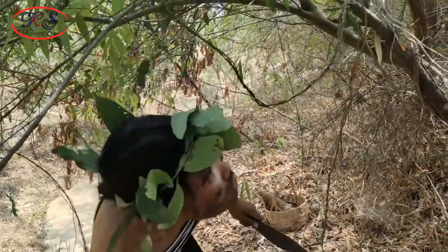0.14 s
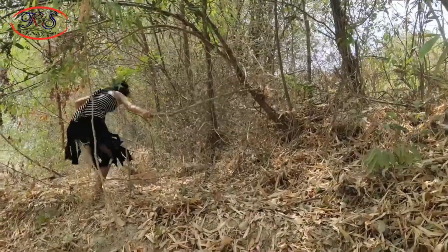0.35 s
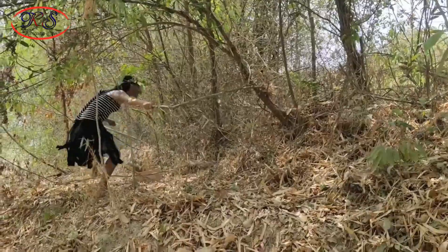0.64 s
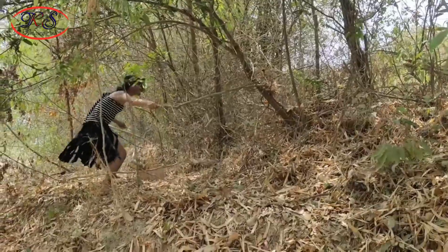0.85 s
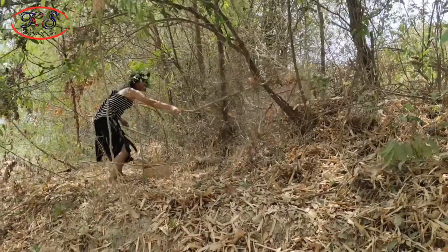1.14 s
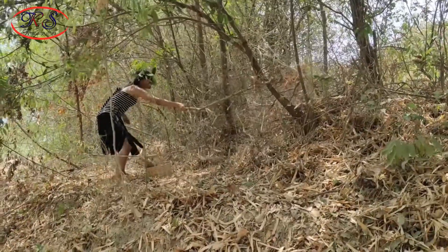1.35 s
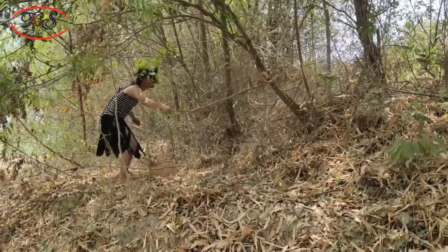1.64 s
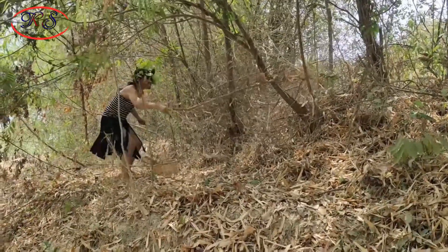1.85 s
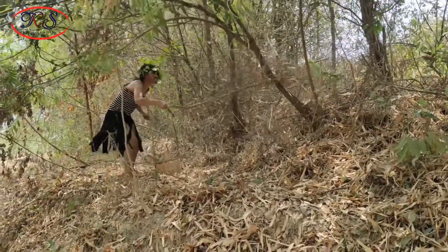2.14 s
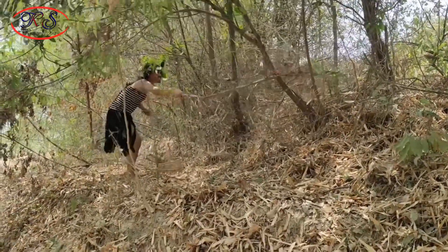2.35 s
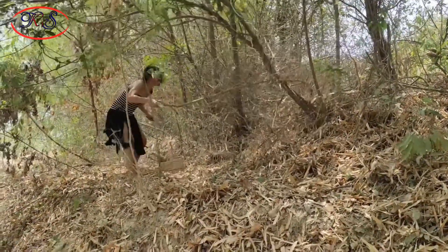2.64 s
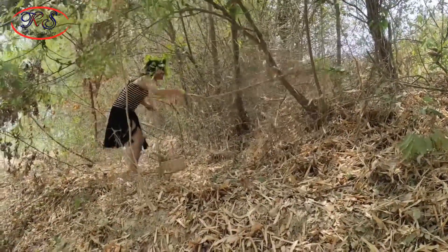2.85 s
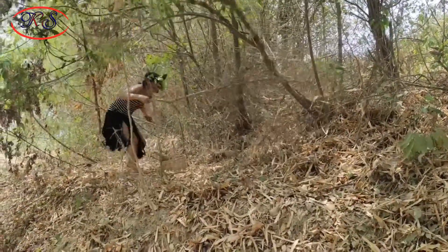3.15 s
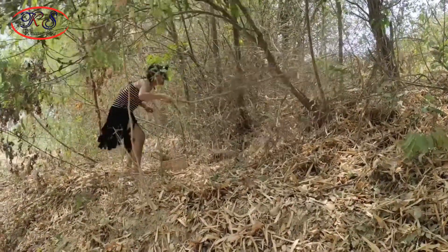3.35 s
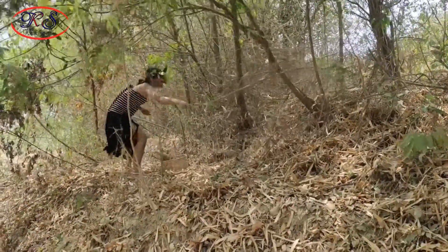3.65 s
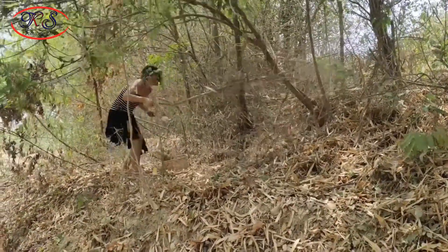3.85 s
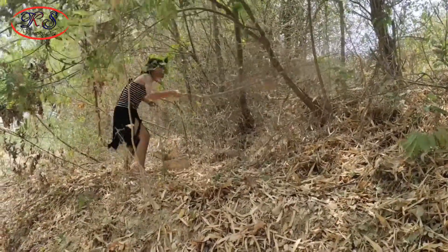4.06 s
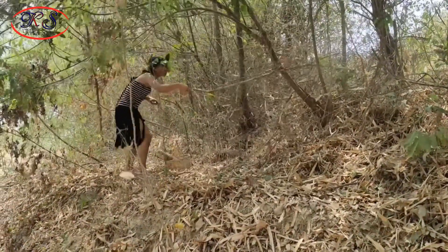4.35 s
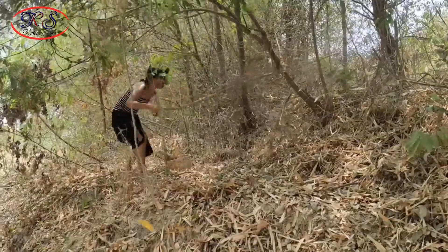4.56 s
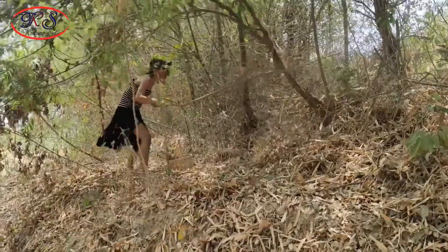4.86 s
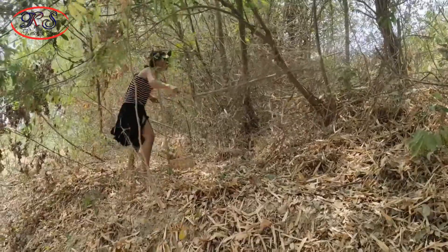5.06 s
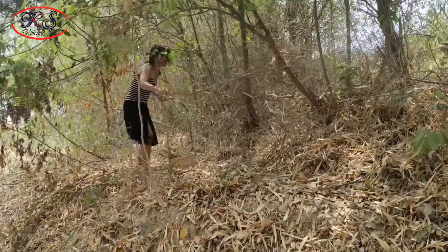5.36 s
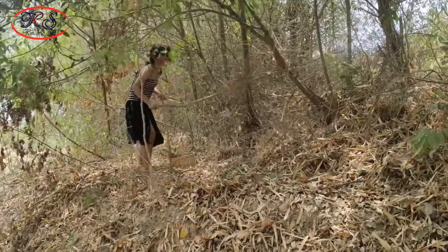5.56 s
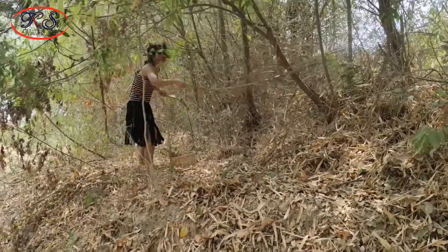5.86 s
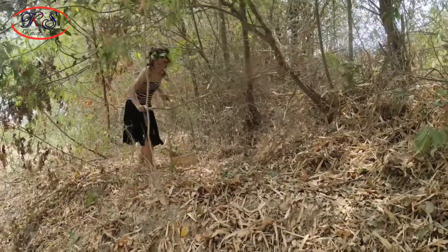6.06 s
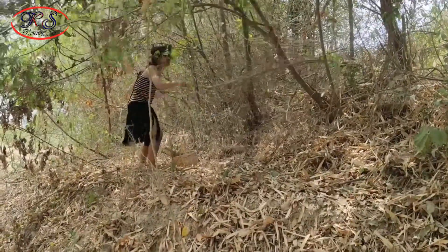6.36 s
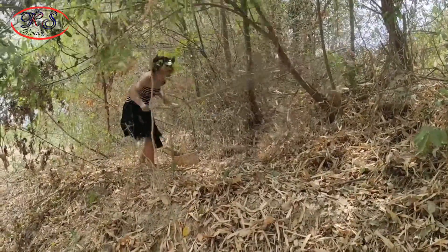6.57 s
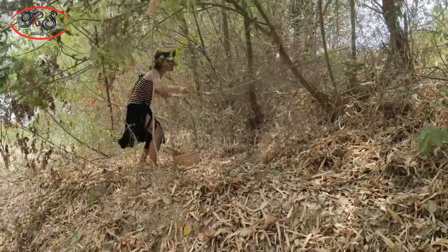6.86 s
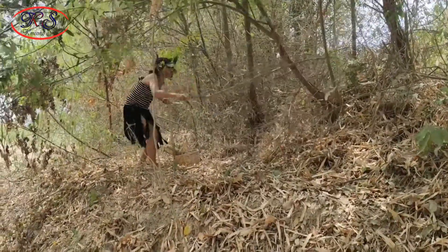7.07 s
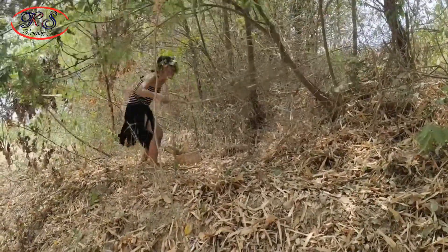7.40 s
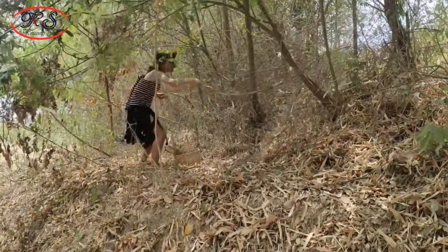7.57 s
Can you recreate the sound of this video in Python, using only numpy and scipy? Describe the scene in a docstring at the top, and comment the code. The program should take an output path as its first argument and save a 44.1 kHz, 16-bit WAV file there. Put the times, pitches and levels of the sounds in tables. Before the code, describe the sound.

In a dry forest, a few metres from the microphone, a long stick is pushed through brush and leaf litter. Soft shuffling opens it, then a loud double twig snap at 0.25 s, followed by small ticks and dull scuffs. Another hard snap comes at 1.04 s, with a faint reedy scrape of a hollow stem nearby, and the third at 1.95 s, each with a brief grainy tail. From 2.4 s the leaf swishes grow stronger: bright hissing swells with rattling thin stems near 2.5, 3.1, 3.7, 4.5, 6.1 and 6.6 s, and weaker ones between. Smaller snaps crackle at 3.1, 3.6, 4.55, 5.3, 6.0-6.1, 6.55 and 6.9 s, among scattered leaf ticks. Rustling continues to the end at 7.7 s. Low, soft wind puffs bump the microphone, most around 3.3 and 6 s. The top end is slightly dulled.

```python
"""A stick through dry brush

In a forest, some metres from the microphone, someone sweeps a long stick through dry brush and leaf litter.
Each push swells a hiss of leaves and a rattle of stems, both made from patchy noise and tiny rings.
Twigs snap as struck modes with a scattered tail, single leaves tick, and a scraped hollow stem sings.
Under it lie dull, patchy scuffs of filtered noise and low puffs of light wind on the microphone."""
import sys
import numpy as np
from scipy import signal
from scipy.fft import rfft, irfft, next_fast_len
from scipy.io import wavfile

SR = 44100
rng = np.random.default_rng(int(sys.argv[2]) if len(sys.argv) > 2 else 0)


def to_wav(s):
    """Save 16-bit WAV."""
    ch = np.atleast_2d(s).T  # columns
    pcm = np.round(np.clip(ch, -1, 1) * 32767)  # PCM
    wavfile.write(sys.argv[1], SR, pcm.astype(np.int16))


N = 340874
TIME = np.arange(N) / SR  # s

# Pushes of the stick through the brush, from full sweeps to light nudges.
# Each row: time of the height in seconds, leaves in dB, stems in dB (both before trims), length in seconds.
SWEEPS = [(0.229, -46.5, -44, 0.039), (0.746, -57, -70, 0.026), (0.873, -49, -54, 0.055),
          (1.113, -45, -54, 0.15), (1.674, -47, -53, 0.049), (1.914, -46, -48, 0.069),
          (2.124, -47, -49, 0.052), (2.268, -46, -50.5, 0.093), (2.466, -38.5, -45.5, 0.068),
          (2.66, -50.5, -52, 0.23), (2.84, -43.5, -50, 0.069), (3.077, -38.5, -46, 0.08),
          (3.115, -49, -44, 0.039), (3.32, -47, -57, 0.075), (3.455, -45.5, -50.5, 0.11),
          (3.676, -41, -52.5, 0.051), (3.736, -36.5, -46, 0.055), (3.87, -49.5, -72, 0.095),
          (4.032, -46, -55.5, 0.13), (4.19, -75, -52.5, 0.086), (4.549, -38.5, -43.5, 0.081),
          (4.796, -50.5, -54, 0.1), (4.883, -46.5, -56, 0.045), (5.337, -48.5, -45.5, 0.046),
          (5.436, -46, -52, 0.088), (5.586, -55, -47.5, 0.086), (5.87, -53, -50.5, 0.092),
          (5.976, -45, -70, 0.032), (6.067, -37.5, -55, 0.064), (6.166, -52, -52, 0.053),
          (6.38, -45.5, -48.5, 0.039), (6.569, -38.5, -52, 0.058), (6.733, -47.5, -57.5, 0.25),
          (6.918, -40, -64, 0.043), (7.01, -71, -50, 0.052), (7.142, -40.5, -48, 0.11),
          (7.406, -46.5, -64, 0.16), (7.563, -64, -51, 0.22), (7.725, -40.5, -52, 0.06)]
# The litter keeps stirring between pushes. Each row: time in seconds, leaves in dB, stems in dB, before trims.
STIRRING = [(0, -51, -55.5), (.2, -57, -54.5), (.4, -58.5, -52), (.7, -62.5, -53), (1, -63, -53),
            (1.5, -58, -50.5), (2.02, -61, -55), (2.5, -44.5, -48), (3.25, -57, -52), (4.35, -56, -54),
            (5.1, -49.5, -52.5), (5.25, -60, -52), (6.3, -46.5, -54), (7.73, -58, -55)]
# Spectrum of the leaf hiss. Each row: frequency in Hz, relative level in dB per Hz.
LEAF_SPECTRUM = [(2400, -27.5), (4000, -16.5), (4500, -11), (4930, -5), (5450, -10), (5800, -7),
                 (6300, -4.5), (7000, -2.5), (7250, 0.5), (7600, -0.5), (8400, -1.5), (11000, -68)]
# Spectrum of the thin stems. Each row: frequency in Hz, relative level in dB per Hz.
STEM_SPECTRUM = [(900, -55), (1450, 2), (1900, -6), (2250, -2.5), (2450, -2), (2850, 3), (3100, 2.5),
                 (3330, 2.5), (3650, 2.5), (4130, 4.5), (4500, -0.5), (4850, 3), (5400, 1), (6800, -30.5),
                 (11000, -95)]
# Spectrum of the thicker stems. Each row: frequency in Hz, relative level in dB per Hz.
THICK_STEM_SPECTRUM = [(1100, -30.5), (1600, -2.5), (2000, 1), (2450, 1.5), (3000, -2.5), (4500, -48)]

# A short, faint click in the first row, then snapping twigs, all made alike.
# Each row: start in seconds, peak of the break in dB, middle and top mode in dB added to
# the twig's own, scattered tail in dB, lowest mode in Hz before a small random detuning,
# crunch as a factor on durations (1 = clean break, more = drawn out).
CLICK_AND_SNAPS = [(.167, -26.5, -14, -14, -62, 2700, 1), (0.254, -8, -14.5, -19, -31.5, 2900, 1.47),
                   (0.2675, -17.5, -12, -14, -38, 3100, 1.5), (1, -25, -2, -19, -39, 3200, 2),
                   (1.0374, -9, -19, -9, -25, 2880, 1.5), (1.501, -29, -23, -26, -54, 2670, 1.9),
                   (1.955, -6.5, -4.5, -16.5, -33, 3070, 1.8), (3.1203, -18, -6, -2, -48, 3500, 1.2),
                   (3.641, -24.5, -9, -3, -47, 2720, 1.6), (4.562, -27, 1, 12, -47, 2600, 1.4),
                   (5.3304, -24, -14, -20, -49, 2820, 1.7), (6.0222, -21.5, -6, 20, -57, 2950, 2.4),
                   (6.0838, -23, -3, 14, -51, 2900, 3), (6.539, -16.5, 0, 5, -39.5, 2950, 1.6),
                   (6.5648, -18, 18, 12, -55, 3400, 1.4), (6.9112, -23.5, 2, 22, -60, 2950, 1.9)]
# What a breaking twig rings with, lowest mode first.
# Each row: nominal frequency in Hz, relative level in dB, T60 in seconds of a clean break.
TWIG_MODES = [(2940, -8.5, 0.0049), (4920, -2, 0.0037), (7550, 6, 0.0024)]
# Spectrum of a snap scattered by the thicket. Each row: frequency in Hz, relative level in dB per Hz.
TAIL_SPECTRUM = [(410, -49), (700, -34.5), (1020, -26), (1190, -19), (1360, -17.5), (1820, -18.5),
                 (2220, -6), (3620, -6), (4140, -1), (4890, -5.5), (7260, 0), (7730, -1.5), (8400, 0.5),
                 (10900, -53.5), (18500, -120)]
# Single dry leaves cracking. Each row: start in seconds, peak of the ring in dB, pitch in Hz.
LEAF_TICKS = [(0.2625, -24, 4100), (.351, -30, 4240), (.369, -30, 2830), (0.4443, -29, 3900),
              (.452, -35, 2400), (0.477, -33, 2560), (.498, -34, 3370), (0.737, -34, 3400),
              (0.7454, -38, 6340), (.7907, -37, 3900), (.8574, -32, 4200), (0.863, -29.5, 5240),
              (1.0088, -38, 4300), (1.078, -16, 6460), (1.1186, -29, 7100), (1.336, -43, 4100),
              (1.4657, -35, 2370), (1.5125, -36, 4300), (1.6597, -28, 6240), (1.668, -34, 3400),
              (1.873, -30, 3340), (1.8847, -33, 3140), (2.2307, -34, 2900), (2.265, -33, 2300),
              (2.276, -33.5, 3000), (2.606, -33, 2370), (2.622, -35, 2800), (2.652, -30, 4100),
              (2.8635, -38, 7200), (2.8893, -28, 7500), (3.0026, -29, 6800), (3.0455, -30, 4440),
              (3.134, -27, 3730), (3.14, -36, 2520), (3.1773, -25.5, 4140), (3.2829, -36, 2500),
              (3.288, -31, 4700), (3.5125, -31, 3970), (3.605, -36, 2180), (3.6323, -31, 6500),
              (3.7208, -30, 7400), (3.8004, -33, 3900), (3.9774, -39, 4100), (4.1844, -42, 3100),
              (4.2128, -34, 2200), (4.3009, -36, 6430), (4.3376, -33, 7600), (4.4552, -35, 7400),
              (4.4907, -33, 2710), (4.5464, -21, 6300), (4.5643, -18.5, 7600), (4.622, -33, 2300),
              (4.6547, -32, 2200), (4.7037, -34, 4430), (4.747, -32, 6640), (4.7711, -36, 7400),
              (4.8842, -39, 4770), (4.957, -37, 4840), (5.0976, -35, 4100), (5.1977, -33.5, 2390),
              (5.2312, -36, 1600), (5.2724, -39, 3500), (5.3184, -32, 4800), (5.3416, -26, 3500),
              (5.3907, -30, 6700), (5.4342, -40, 3800), (5.5796, -38, 4000), (5.6174, -40, 4200),
              (5.649, -32.5, 4270), (5.709, -37, 4700), (5.8368, -36, 2700), (6.04, -29, 7350),
              (6.137, -31, 7300), (6.1472, -27, 7100), (6.1627, -34, 3560), (6.1962, -27, 6600),
              (6.2703, -36, 3340), (6.4439, -32, 2770), (6.547, -21, 6000), (6.5737, -21, 6100),
              (6.5955, -34, 4100), (6.8477, -35, 4260), (6.919, -27, 7100), (6.9274, -40, 4300),
              (6.9438, -29, 7260), (7.0105, -31, 4800), (7.1435, -26, 6300), (7.2323, -41, 4200),
              (7.2852, -40, 5050), (7.3387, -30, 7400), (7.5038, -34, 3030), (7.5296, -34, 3700),
              (7.5891, -39, 4260), (7.713, -31, 6800)]

# The stick scrapes along one hollow stem. Each row: time of the height in seconds, level in dB,
# length in seconds, frequency in Hz that sings most where the stick touches.
CANE_SCRAPES = [(0.47, -57, 0.086, 2510), (0.596, -53, 0.024, 3300), (0.77, -55, 0.047, 3460),
                (0.983, -44.5, .008, 4130), (1.15, -46, 0.074, 4090), (1.56, -53.5, 0.093, 4300),
                (5.357, -49, 0.029, 3450), (7.08, -58, 0.1, 2840), (7.55, -52, 0.15, 3660)]
# Modes of that stem. Each row: frequency in Hz, width in Hz, relative level in dB.
CANE_MODES = [(2790, 130, -7), (3330, 170, -9), (4150, 170, 0)]

# Scuffs and scrapes on the ground.
# Each row: start in seconds, level in dB before trim and length weighting, centre in Hz, length in seconds.
SCUFFS = [(.005, -52.5, 2030, 0.052), (0.163, -46, 1720, 0.017), (0.17, -47, 490, 0.04),
          (0.429, -37, 1070, 0.0088), (0.515, -43.5, 554, 0.081), (.57, -46.5, 530, 0.032),
          (0.571, -49, 1010, 0.043), (0.633, -47.5, 527, 0.082), (0.805, -54.5, 810, 0.058),
          (0.941, -43.5, 910, 0.033), (1.033, -42, 1400, 0.091), (1.298, -50.5, 310, 0.099),
          (1.52, -49.5, 526, 0.061), (1.586, -52, 1100, 0.097), (1.739, -42, 537, 0.03),
          (1.83, -50.5, 290, 0.069), (2.037, -47.5, 360, 0.026), (2.145, -46.5, 393, 0.029),
          (2.175, -46.5, 820, 0.066), (2.358, -50.5, 302, 0.1), (2.578, -49, 990, 0.029),
          (2.765, -48.5, 720, 0.078), (3.393, -48.5, 400, 0.053), (3.44, -49.5, 1010, 0.073),
          (3.602, -54, 2280, 0.054), (3.699, -50, 440, 0.077), (3.729, -55, 970, 0.12),
          (3.938, -49.5, 804, 0.098), (3.99, -49, 448, 0.044), (4.2045, -39, 740, 0.019),
          (4.31, -55, 474, 0.044), (4.431, -49, 815, 0.071), (4.782, -48, 480, 0.016),
          (4.878, -47, 940, 0.12), (5.019, -53, 930, 0.05), (5.139, -49.5, 2300, 0.076),
          (5.223, -46, 1390, 0.018), (5.51, -46, 1250, 0.016), (5.582, -51, 1790, 0.035),
          (5.627, -44.5, 1410, .012), (5.724, -46.5, 416, 0.12), (6.072, -42.5, 466, 0.011),
          (6.12, -49, 660, 0.16), (6.404, -44.5, 670, 0.049), (6.403, -51, 2900, 0.088),
          (6.517, -47, 1400, 0.065), (6.763, -50.5, 400, 0.13), (7.197, -55.5, 970, 0.49),
          (7.413, -46.5, 400, 0.09), (7.653, -47.5, 504, 0.025)]
# Soft shuffling under the scuffs.
# Each row: time in seconds, dull low part in dB, hollow upper part in dB, both before trim.
SHUFFLE = [(0, -52.5, -50), (.4, -50.5, -47.5), (.68, -50.5, -49.5), (.8, -55.5, -48), (1.85, -53, -49.5),
           (2.03, -65, -52.5), (2.25, -56.5, -47), (2.6, -56.5, -49.5), (2.85, -51.5, -50),
           (3.1, -58.5, -53), (3.6, -60, -49), (3.88, -57, -51.5), (4.1, -45, -48.5), (4.65, -52, -50),
           (5.15, -47.5, -52.5), (5.45, -50.5, -49.5), (5.9, -49.5, -49.5), (6.5, -46.5, -49.5),
           (7.1, -53, -47.5), (7.73, -47.5, -48)]
# Spectrum of the dull low part. Each row: frequency in Hz, relative level in dB per Hz.
LITTER_SPECTRUM = [(110, -40.5), (190, 6.5), (290, 2), (370, 2.5), (455, 5.5), (560, -1), (680, -11.5),
                   (850, -21.5), (1300, -61.5)]
# Spectrum of the hollow upper part. Each row: frequency in Hz, relative level in dB per Hz.
HUSK_SPECTRUM = [(350, -50.5), (560, -7), (700, -1), (830, 1), (930, 0), (1030, 2), (1170, -3), (1360, 2.5),
                 (1570, -2.5), (1710, 2.5), (1900, -26), (2150, -8.5), (2500, -33.5)]

# Strength of the breeze. Each row: time in seconds, level in dB before trim.
BREEZE = [(0, -74), (.55, -56.5), (1.1, -57.5), (1.55, -62.5), (2.25, -48.5), (2.6, -67.5), (3, -47.5),
          (3.15, -50), (3.55, -51), (3.78, -41), (4.15, -47), (4.6, -45.5), (5, -53.5), (5.68, -53),
          (5.84, -44.5), (6.02, -44), (6.35, -56), (6.75, -53.5), (7.2, -55.5), (7.55, -77), (7.73, -58)]
# Single gusts on top. Each row: time of the height in seconds, level in dB before trim, length in seconds.
GUSTS = [(.21, -50, 0.037), (1.29, -43, 0.013), (1.77, -53, 0.031), (3.22, -42, 0.049), (3.33, -37, 0.055),
         (3.44, -42, .02), (3.98, -43, 0.02), (4.67, -40, .02), (5.985, -38.5, 0.0099), (6.07, -42, 0.013),
         (6.5, -47, 0.013)]
# Spectrum of wind on the microphone. Each row: frequency in Hz, relative level in dB per Hz.
BUFFET_SPECTRUM = [(12, -23.5), (25, -18.5), (40, -8.5), (60, -1.5), (83, 1.5), (110, -2.5), (140, -6.5),
                   (210, -16), (270, -21), (330, -23), (450, -58)]

# Band limit of the digital sound, as resampling leaves it. Each row: frequency in Hz, gain in dB.
BAND_LIMIT = [(0, 0), (7700, 0), (7970, -16), (8250, -16), (8500, -34), (8800, -90)]

# Rise and fall of a push or gust as shares of its length; shape 1 = pointed, 2 = bell.
SWELL_SHARE, SETTLE_SHARE, SWEEP_SHAPE = 0.81, 1.31, 1.92
# A hard push, the thick stems' level in it, and the dB they gain per dB of push.
HARD_PUSH_DB, THICK_DB, THICK_GROWTH = -45.5, -53, 1.5
# A twig gives way fibre by fibre; both times are for a clean break.
CRACK_RISE_S, TEAR_S, TEAR_DB = 0.000087, 0.0008, -11.5
# Ring of a leaf tick, and its brittle edge.
TICK_T60_S, TICK_EDGE_DB, TICK_EDGE_S = .0055, -17, .0004
# The hollow stem is never quite still; its modes beside the one that sings; how long that one rings.
CANE_REST_DB, CANE_OTHERS_DB, CANE_T60_S = -80.5, -5.5, 0.032
# The recorder's gain control: listening window in samples, then threshold, share of excess and speeds.
LISTEN = 128
DUCK_ABOVE_DB, DUCK_SHARE, DUCK_ATTACK_S, RECOVER_DB_PER_S = -29.5, 0.52, 0.011, 75


def leaves():
    """Dry leaves brush each other: near ticks in a hiss of countless far ones, fluttering in bunches."""
    near = crackle(per_s=900, spread_db=2.5, low_hz=3800, high_hz=7900, t60=.005, count=24)
    hiss = patchy_noise(patch_s=0.015, patch_hz=221, patchy_db=0.5, size=256)
    pushes = [(s, leaves_db, length) for s, leaves_db, _, length in SWEEPS]
    motion = swells(pushes, level(STIRRING, axis=1)) * unsteady(wander_s=0.014, depth_db=1.5)
    brushing = bunches(thicket(hiss + gain_of(-10) * near))
    return motion * coloured(brushing, LEAF_SPECTRUM)


def stems():
    """Thin stems knock and scrape, ringing lower and longer than leaves; hard pushes bend thicker ones."""
    knocks = crackle(per_s=450, spread_db=3, low_hz=1600, high_hz=5000, t60=.035, count=30)
    clicks = crackle(per_s=260, spread_db=2.5, low_hz=2000, high_hz=5200, t60=.005, count=16)
    scrape = patchy_noise(patch_s=0.033, patch_hz=122, patchy_db=3.0, size=512)
    scattered = bunches(thicket(scrape + gain_of(-2.5) * knocks))
    rattle = evened(scattered + gain_of(-12.5) * clicks)  # brittle stems click
    pushes = [(s, stems_db, length) for s, _, stems_db, length in SWEEPS]
    motion = swells(pushes, level(STIRRING, axis=2))
    thin = gain_of(-2.0) * motion * coloured(rattle, STEM_SPECTRUM)
    bending = gain_of(THICK_DB) * (motion / gain_of(HARD_PUSH_DB)) ** THICK_GROWTH
    other_rattle = np.roll(rattle, N // 2)  # half the scene away, so the two do not coincide
    return thin + bending * coloured(other_rattle, THICK_STEM_SPECTRUM)


def snaps():
    """A sharp break rings a twig and splinters on; shaken stems and leaves answer with a grainy tail."""
    out = np.zeros(N)
    grains = crackle(per_s=1900, spread_db=2, low_hz=1300, high_hz=8000, t60=.003, count=24)
    shaken = grains + gain_of(3) * thicket(rng.standard_normal(N))
    scatter = coloured(shaken, TAIL_SPECTRUM) * unsteady(wander_s=.003, depth_db=.6)
    t = np.arange(SR // 2) / SR
    # a quick fall over a slow one, after a short rise
    fall = gain_of(-60 * t / 0.39) + gain_of(-1.5) * gain_of(-60 * t / 0.025)
    tail = (1 - np.exp(-t / 0.0016)) * fall
    for s, peak_db, middle_db, top_db, tail_db, low_hz, crunch in CLICK_AND_SNAPS:
        crack = gain_of(peak_db) * twig_break(middle_db, top_db, low_hz, crunch)
        add(out, s, crack)
        for delay in rng.uniform(0.00091, 0.0085, 4):  # splinters, s after the break
            add(out, s + delay, gain_of(-11.0 - 60 * delay / 0.045) * crack)
        answer = scatter[round(s * SR):][:len(t)]
        add(out, s, gain_of(tail_db) * answer * tail[:len(answer)])
    return out


def twig_break(middle_db, top_db, low_hz, crunch):
    """A twig's modes start as it gives way, with a noisy tearing of fibres; scaled to a peak of 1."""
    detune = 1 + .012 * rng.standard_normal(len(TWIG_MODES))
    shifts = detune * [low_hz / TWIG_MODES[0][0], 1, 1]
    crack = 0
    for (hz, db, t60), extra_db, shift, sign in zip(TWIG_MODES, [0, middle_db, top_db], shifts, [1, -1, 1]):
        crack = crack + sign * gain_of(db + extra_db) * ring(hz * shift, t60 * crunch, .02)
    age = np.arange(len(crack)) / SR
    thin = signal.butter(2, 1900, "highpass", fs=SR, output="sos")  # a thin twig radiates little bass
    crack = signal.sosfilt(thin, crack) * (1 - np.exp(-age / (CRACK_RISE_S * crunch)))
    tear = rng.standard_normal(len(age)) * np.exp(-age / (TEAR_S * crunch))
    crack = crack / abs(crack).max() + gain_of(TEAR_DB) * tear
    return crack / abs(crack).max()


def ticks():
    """Leaves crack at their own pitch: a brittle edge, a weak lower ring, a faint answer from the litter."""
    out = np.zeros(N)
    t = np.arange(int(.04 * SR)) / SR
    for s, db, hz in LEAF_TICKS:
        edge, noise = rng.standard_normal((2, len(t)))
        tick = ring(hz, TICK_T60_S, .02) + gain_of(-22) * ring(0.52 * hz, TICK_T60_S, .02)
        brittle = (edge * np.exp(-t / TICK_EDGE_S))[:len(tick)]
        tick = tick / abs(tick).max() + gain_of(TICK_EDGE_DB) * brittle
        add(out, s, gain_of(db) * tick)
        answer = signal.fftconvolve(tick, noise * gain_of(-60 * t / 0.078))
        add(out, s, gain_of(db - 33) * answer)
    return out


def cane():
    """Scraping rings a hollow stem's modes unevenly; which sings most depends on where the stick touches."""
    rub = patchy_noise(patch_s=.018, patch_hz=200, patchy_db=4, size=512)
    body = 0
    for hz, width, db in CANE_MODES:
        t60 = np.log(1000) / (np.pi * width)
        body = body + gain_of(db) * evened(ring(hz, t60, .1))
    scraping = swells([row[:3] for row in CANE_SCRAPES], gain_of(CANE_REST_DB))
    out = gain_of(CANE_OTHERS_DB) * scraping * evened(signal.oaconvolve(rub, body)[:N])
    for s, db, length, hz in CANE_SCRAPES:
        singing = signal.oaconvolve(rub, ring(hz, CANE_T60_S, CANE_T60_S))[:N]
        out += swells([(s, db, length)], 0) * evened(singing)
    return out


def scuffing():
    """Dull and hollow shuffling of noise and knocks comes and goes; band-limited noise bursts stand out."""
    noise = patchy_noise(patch_s=.018, patch_hz=55, patchy_db=2.8, size=1024)
    knocks = crackle(per_s=200, spread_db=2.8, low_hz=400, high_hz=1489, t60=.1, count=24)
    bed = noise + gain_of(-6) * knocks
    dull = level(SHUFFLE, axis=1) * coloured(bed, LITTER_SPECTRUM)
    hollow = level(SHUFFLE, axis=2) * coloured(bed, HUSK_SPECTRUM)
    out = gain_of(-5.5) * (dull + hollow)
    hz = np.fft.rfftfreq(SR // 4, 1 / SR)
    t = np.arange(SR // 4) / SR
    for s, db, centre_hz, length in SCUFFS:
        resonance = 1 / (1 + ((hz - centre_hz) / (0.25 * centre_hz)) ** 2)
        band = irfft(rfft(rng.standard_normal(len(t))) * resonance, len(t))
        # swells fast, then dies
        scuff = band * (1 - np.exp(-t / (0.093 * length))) * np.exp(-(t / length) ** 2)
        add(out, s, gain_of(db - 2.0) * evened(scuff) * np.sqrt(length / t[-1]))
    return out


def wind():
    """Lumpy puffs of air on the microphone: low, patchy noise under a wandering breeze and gusts."""
    puffs = patchy_noise(patch_s=0.0048, patch_hz=120, patchy_db=3.3, size=1024)
    strength = swells(GUSTS, level(BREEZE)) * unsteady(wander_s=0.023, depth_db=2.0)
    return gain_of(-0.35) * strength * coloured(puffs, BUFFET_SPECTRUM)


def thicket(x):
    """Paths off ground and trunks interfere, heard as narrow peaks and dips that drift by chance."""
    return patchy(x, patch_s=.09, patch_hz=45, patchy_db=3.3, size=1024)


def bunches(x):
    """Bunches of different size take turns: broad bands come and go within hundredths of a second."""
    return patchy(x, patch_s=.016, patch_hz=420, patchy_db=1.3, size=512)


def crackle(per_s, spread_db, low_hz, high_hz, t60, count):
    """Many small dry things tick at random, on one of count pitches; a few ticks are large. Rms 1."""
    out = np.zeros(N)
    for hz in np.linspace(low_hz, high_hz, count):
        chance, size, place = rng.random((3, 4000))
        sounding = chance < per_s * N / SR / count / len(chance)
        heights = gain_of(spread_db * np.minimum(-np.log(size), 4))
        clicks = np.bincount((place * N).astype(int), sounding * heights, N)
        out += signal.oaconvolve(clicks, ring(hz, t60, 2 * t60))[:N] * rng.choice([-1, 1])
    return evened(out)


def ring(hz, t60, length):
    """A struck mode: a sine that decays by 60 dB in t60 seconds."""
    t = np.arange(int(length * SR) + 2) / SR
    return np.sin(2 * np.pi * hz * t) * np.exp(-np.log(1000) * t / t60)


def patchy_noise(patch_s, patch_hz, patchy_db, size):
    """White noise that flickers in patches of time and frequency."""
    return patchy(rng.standard_normal(N), patch_s, patch_hz, patchy_db, size)


def patchy(x, patch_s, patch_hz, patchy_db, size):
    """Lets a sound's level wander in patches of time and frequency, at an rms of 1."""
    hop = size // 4
    z = signal.stft(x, nperseg=size, noverlap=size - hop)[2]
    field = rng.standard_normal(z.shape)
    # smooth the random field over frequency bins, then over frames
    for axis, width in enumerate([patch_hz * size / SR, patch_s * SR / hop]):
        bell = np.exp(-.5 * (np.arange(-64, 65) / width) ** 2)
        field = signal.fftconvolve(field, np.expand_dims(bell, 1 - axis), "same", axes=axis)
    z = z * gain_of(patchy_db * np.minimum(evened(field), 2))
    return evened(signal.istft(z, nperseg=size, noverlap=size - hop)[1][:N])


def swells(rows, rest):
    """Pushes or gusts (s, dB, length s) build and settle; they add in power to a resting level."""
    power = np.zeros(N) + rest ** 2
    for s, db, length in rows:
        before = min(round(s * SR), round(4 * length * SR))  # samples ahead of the height
        t = np.arange(-before, 5 * length * SR) / SR
        span = length * np.where(t < 0, SWELL_SHARE, SETTLE_SHARE)
        push = gain_of(db) * np.exp(-abs(t / span) ** SWEEP_SHAPE)
        add(power, s + t[0], push ** 2)
    return np.sqrt(power)


def unsteady(wander_s, depth_db):
    """A gain that wanders by chance, between random steps wander_s apart."""
    steps = np.clip(rng.standard_normal(2000), -2, 2)
    return gain_of(depth_db * np.interp(TIME / wander_s, np.arange(len(steps)), steps))


def coloured(x, points):
    """Filters a sound by a curve of dB over log frequency, at an rms of 1."""
    size = next_fast_len(len(x))
    hz, db = np.transpose(points)
    shape = np.interp(np.log(np.fft.rfftfreq(size, 1 / SR) + 1), np.log(hz + 1), db)
    return evened(irfft(rfft(x, size) * gain_of(shape), size)[:len(x)])


def level(rows, axis=1):
    """One dB column of a curve as a gain for every sample."""
    rows = np.asarray(rows)
    return gain_of(np.interp(TIME, rows[:, 0], rows[:, axis]))


def gain_of(db):
    """Decibels to amplitude."""
    return 10 ** (np.asarray(db) / 20)


def evened(x):
    """Scales to an rms of 1."""
    return x / np.sqrt(np.mean(x ** 2) + 1e-20)


def add(mix, s, sound):
    """Mixes a sound in, in place, at a time in seconds."""
    part = mix[max(round(s * SR), 0):][:len(sound)]
    part += sound[:len(part)]


def scene():
    """All sources at one microphone, from the brush to the wind."""
    brush = leaves() + stems()
    breaks = snaps() + ticks()
    return (brush + breaks + cane() + scuffing() + wind())[None]


def record(dry):
    """Gain control ducks briefly after loud snaps; then resampling cuts the top near 8 kHz."""
    power = signal.lfilter(np.ones(LISTEN) / LISTEN, 1, dry[0] ** 2)
    power_db = 10 * np.log10(power + 1e-12)
    # hold each peak, letting it fall at a steady rate
    recovery = RECOVER_DB_PER_S * TIME
    held_db = np.maximum.accumulate(power_db + recovery) - recovery
    over_db = np.maximum(held_db - DUCK_ABOVE_DB, 0)
    lag = np.exp(-1 / (DUCK_ATTACK_S * SR))
    duck_db = DUCK_SHARE * signal.lfilter([1 - lag], [1, -lag], over_db)
    ducked = dry / gain_of(duck_db)
    hz, db = np.transpose(BAND_LIMIT)
    # a steep low-pass stands for the resampling
    taps = signal.firwin2(401, [*hz, SR / 2], [*gain_of(db), 0], window=("kaiser", 7), fs=SR)
    return signal.oaconvolve(ducked, taps[None], "same")


dry = scene()
out = record(dry)
to_wav(out)
```